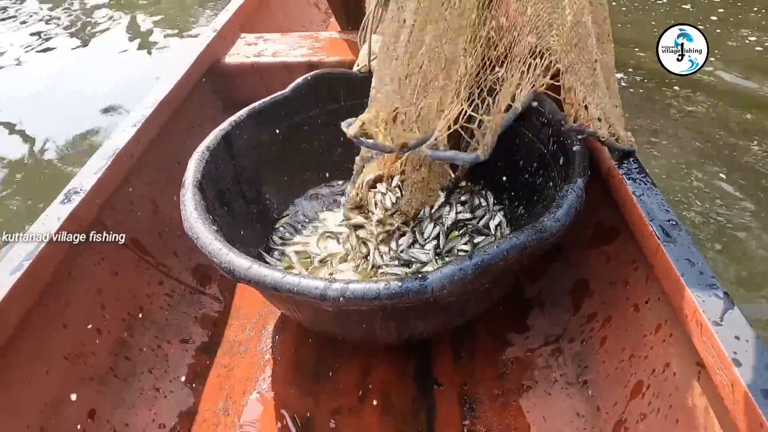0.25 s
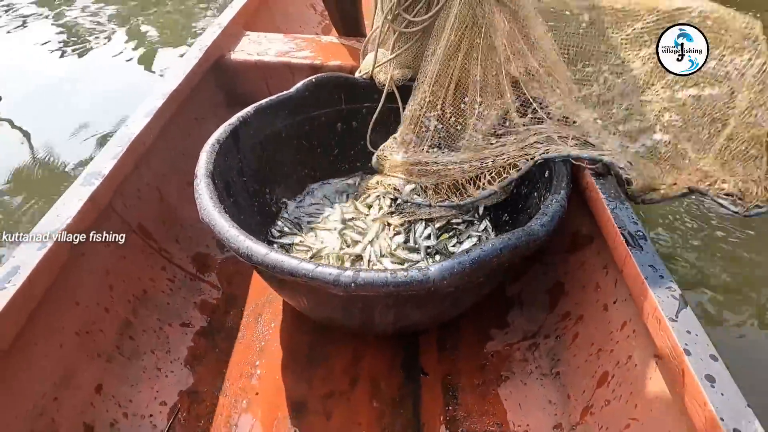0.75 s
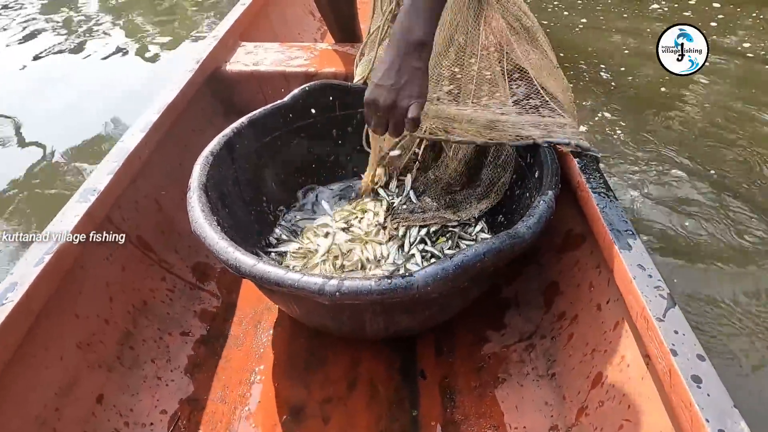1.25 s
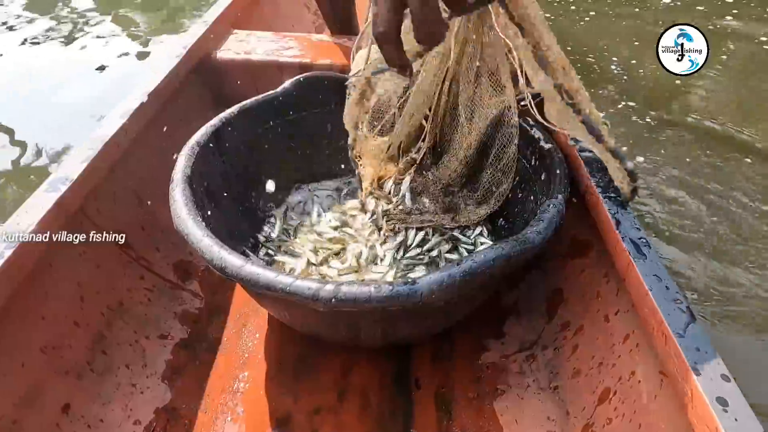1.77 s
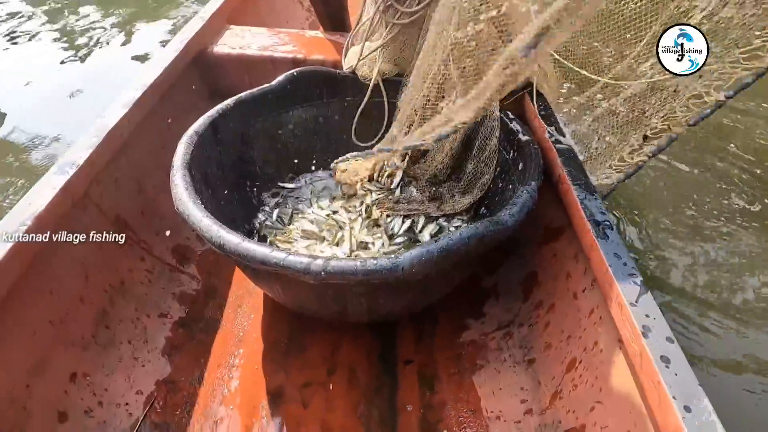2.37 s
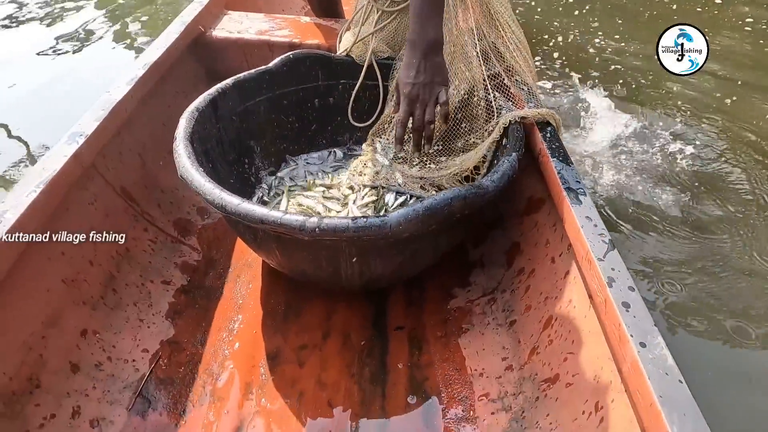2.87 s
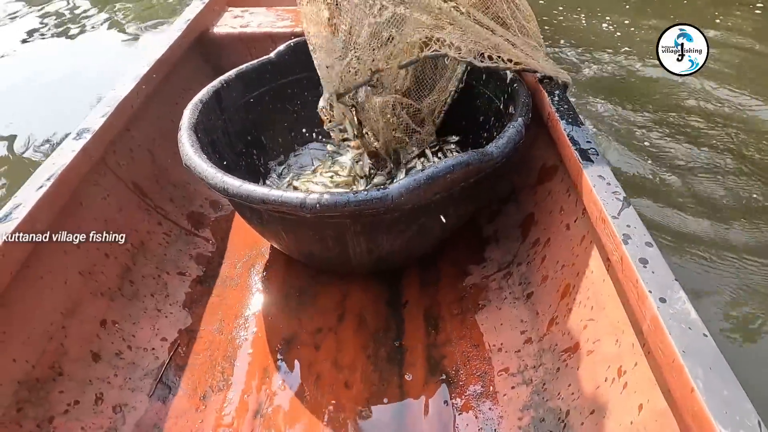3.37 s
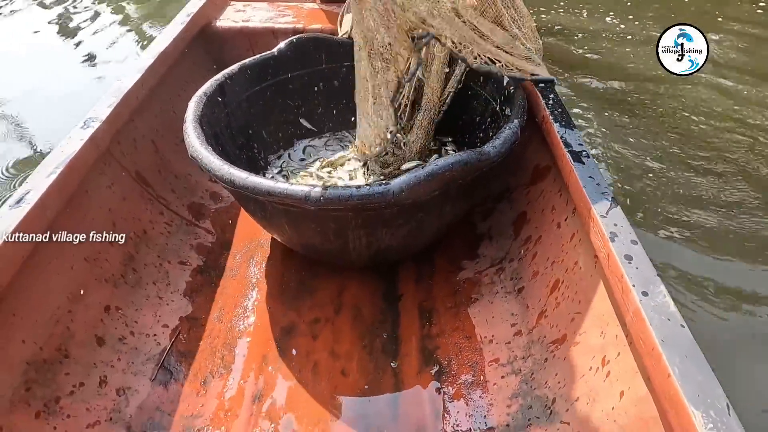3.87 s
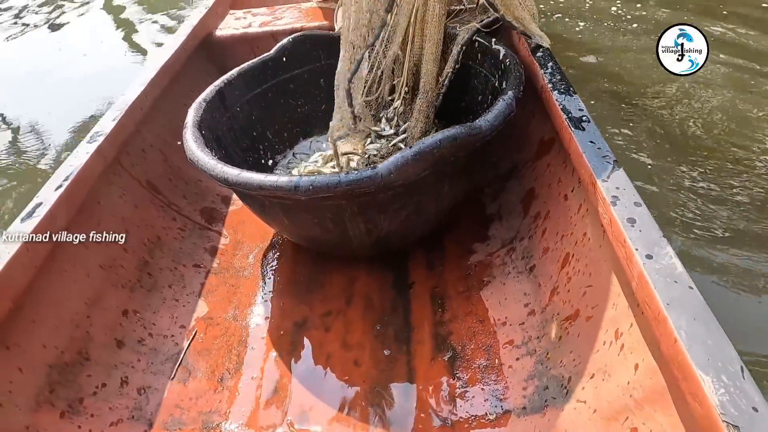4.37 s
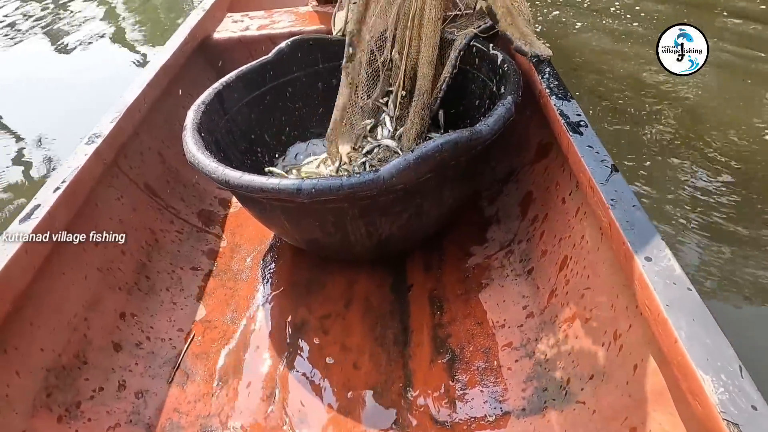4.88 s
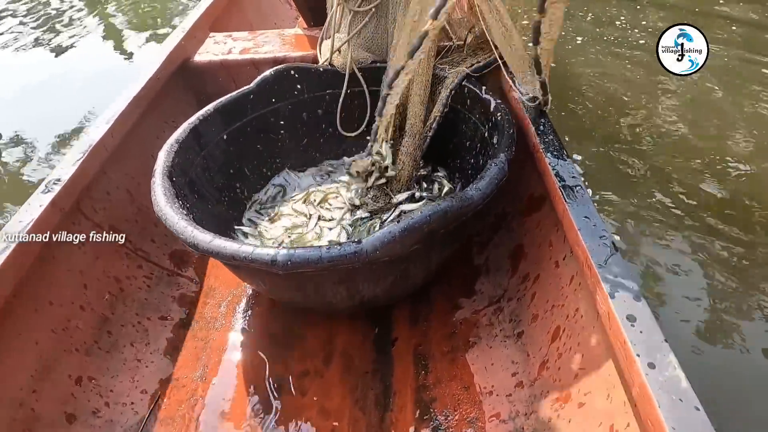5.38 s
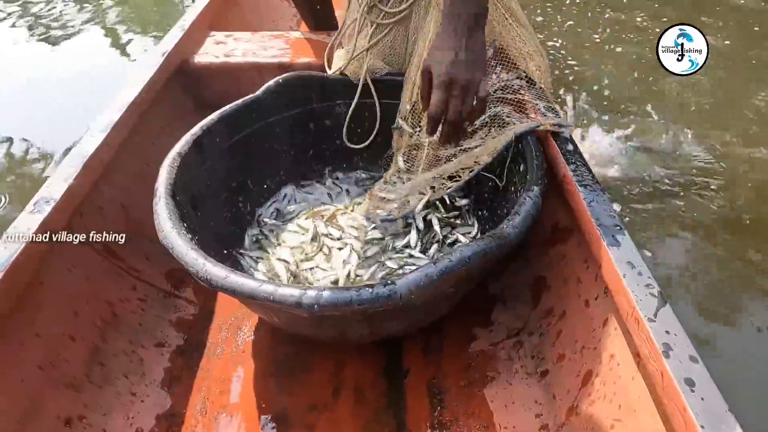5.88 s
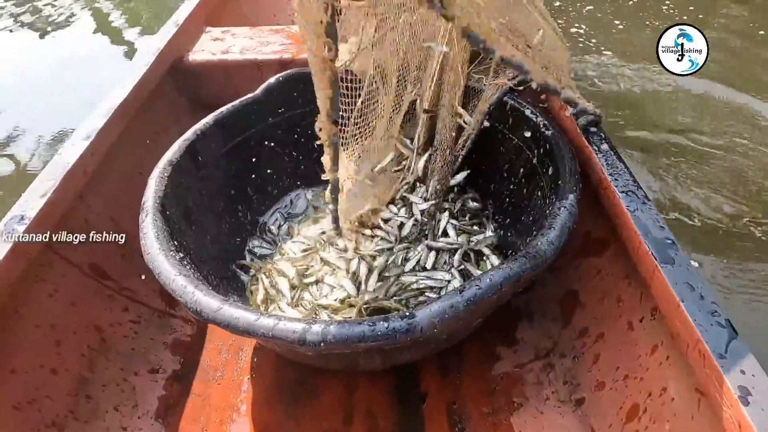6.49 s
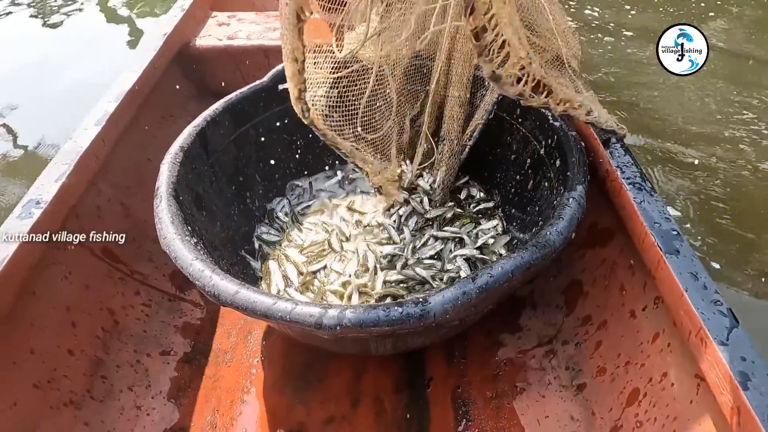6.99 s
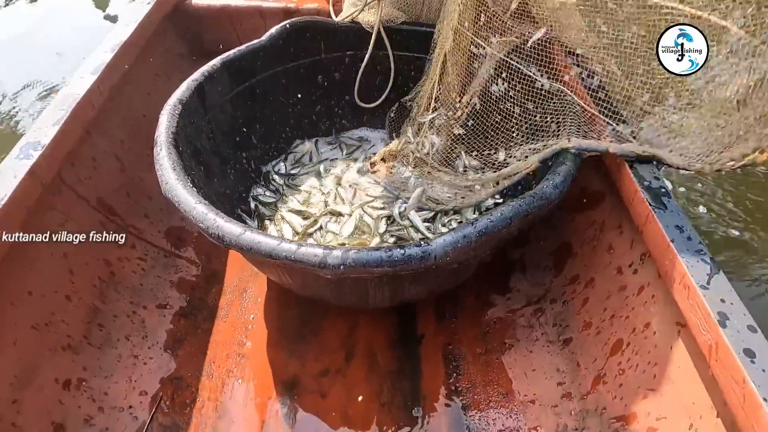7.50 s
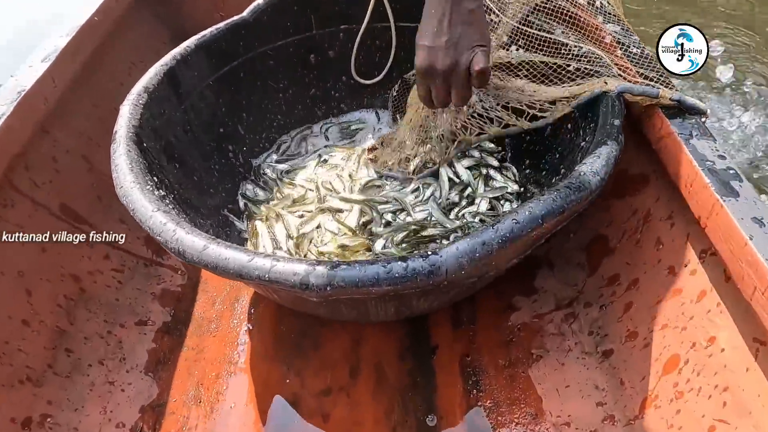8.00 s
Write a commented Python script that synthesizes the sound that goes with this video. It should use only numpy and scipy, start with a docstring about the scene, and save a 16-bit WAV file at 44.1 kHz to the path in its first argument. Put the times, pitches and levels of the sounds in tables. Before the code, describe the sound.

Outdoors in a wooden boat, closely heard and almost mono, a weighted wet net is shaken over small fish in a plastic tub. A hollow clatter opens at 0 s, with another knock at 0.25 and a stronger rattle and splash from 0.76 to 1.0. Two watery gulps follow at 1.1-1.2, then a low thump at 1.26. Lighter scraping and fish flicks lead to a hard clatter with spray at 2.6-2.8. Wet plips continue, with knocks near 3.4 and 3.9 and faint hoarse birds around 3-4. From 4 to 5.6 it is sparse: drips, small scrapes, a knock at 4.7, a distant bird at 5.2. A sharp rattle lands at 5.75, with splashing to 6. A splash and heavy low bump come near 6.5, a faint bird at 6.8, then a strong wet clatter at 7.55-7.9, easing into drips over light wind.

```python
"""Lead weights knock on tub and hull as a wet cast net is shaken out over small fish in a wooden boat.
The knocks are ragged noise bursts that ring struck modes; the dragging mesh is grainy noise through the
same modes. Spray is patchy noise with tiny rising tones, drips and fish flicks are short tones in noisy
puffs, and snaps are bright cracks. Behind them lie hollow gulps, a low thump, hoarse far birds in narrow
bands of noise, and a light wind and short low lumps of shaped noise."""
import sys
import numpy as np
from scipy import signal
from scipy.fft import rfft, irfft, next_fast_len
from scipy.io import wavfile
from scipy.ndimage import uniform_filter1d, map_coordinates

SR = 44100
rng = np.random.default_rng(int(sys.argv[2]) if len(sys.argv) > 2 else 0)


def unload_wav(signal):
    """Save mono or channel-first audio to the path in sys.argv[1] as 16-bit WAV at rate SR, clipped to [-1, 1]."""
    wavfile.write(
        sys.argv[1],
        SR,
        np.round(np.clip(np.atleast_2d(signal).T, -1, 1) * 32767).astype(np.int16),
    )


N = 363825

# Spectra are brought to rms 1 before mixing, so their levels are relative.
# low wind buffeting: (frequency [Hz], relative level [dB])
BUFFET_SPECTRUM = [(8.8, -33), (15, 7), (46, -0.5), (92, -15), (110, -7.5), (140, -56), (240, -120)]
# higher flutter, shared by wind and low lumps: (frequency [Hz], relative level [dB])
FLUTTER_SPECTRUM = [(35, -25.5), (60, 5.5), (91, -10.5), (129, 6), (216, -4.5), (320, -9.5), (420, -14.5),
                    (700, -120)]
# steady air of the river: (frequency [Hz], relative level [dB])
AIR_SPECTRUM = [(120, -25), (200, 12), (936, -14.5), (1040, -43), (1180, -35), (2940, -10), (7680, -1),
                (13000, -12), (15300, -54)]
# water spray: (frequency [Hz], relative level [dB])
SPRAY_SPECTRUM = [(530, -6.5), (900, -1.5), (1350, -4.5), (1630, -4.5), (1830, -4), (1990, -7.5),
                  (2410, -5.5), (3020, -6.5), (8170, -18), (15300, -27.5)]
# hiss that differs between left and right: (frequency [Hz], relative level [dB])
SIDE_HISS_SPECTRUM = [(2940, -26), (5000, -16), (8020, -16), (10000, -16), (12600, 0.5), (15300, -3)]
# treble roll-off of the microphone: (frequency [Hz], gain [dB])
MIC_TREBLE = [(5000, -1), (10000, -6.5), (13000, -9.5), (15500, -15)]
TOP_HZ = 15500  # band limit

# overall wind strength: (time [s], level [dB])
WIND_STRENGTH = [(0.0, -35.5), (0.46, -41.5), (0.94, -43), (1.31, -40.5), (1.56, -39), (1.79, -38),
                 (2.23, -41), (2.44, -41), (4.02, -45.5), (4.41, -47), (4.78, -41), (6.09, -44.5),
                 (6.52, -42.5), (7.35, -39), (7.7, -39), (8.25, -44.5)]
# short low lumps, from wind gusts and hull thuds: (time [s], level [dB])
LOW_LUMPS = [(0.05, -40), (0.94, -41.5), (1.07, -43.5), (1.56, -36.5), (1.77, -42), (2.0, -37.5),
             (2.3, -33), (2.64, -33.5), (2.76, -44), (3.49, -34.5), (3.68, -33.5), (4.2, -47), (4.8, -42),
             (4.93, -45.5), (5.77, -39.5), (6.45, -27), (6.52, -32.5), (6.65, -38), (6.91, -34.5),
             (7.07, -38), (7.16, -48), (7.9, -40)]
LUMP_RISE, LUMP_FALL = 314, 177  # dB per s
FLUTTER_DB = -16  # steady flutter, relative to the wind strength

# far bird notes: (time [s], length [s], pitch [Hz], bandwidth [Hz], level [dB])
BIRD_NOTES = [(3.03, .62, 1900, 600, -51), (3.17, .17, 1225, 30, -54), (3.06, .2, 1960, 45, -56),
              (3.21, .13, 1820, 45, -57), (3.89, .25, 1990, 55, -54.5), (3.95, .14, 2130, 50, -59),
              (5.22, .2, 3250, 350, -56), (6.8, .33, 1900, 200, -52)]
# hollow gulps of water: (time [s], level [dB], pitch [Hz], decay to -60 dB [s])
WATER_GULPS = [(1.073, -21.5, 272, 0.17), (1.19, -23.5, 415, 0.1), (2.975, -34.5, 557, 0.12),
               (6.935, -32, 687, 0.088)]
# a low thump, push and rebound: (time [s], level [dB], pitch [Hz], decay to -60 dB [s])
LOW_THUMP = [(1.258, -5.5, 54, 0.07), (1.272, -7, 8.8, 0.2)]

# single drops snapping on the plastic: (time [s], level [dB])
DROP_SNAPS = [(0.3431, -43), (0.987, -28), (1.0595, -40), (1.1424, -40), (1.268, -37.5), (1.613, -34.5),
              (1.9205, -37), (2.629, -45), (2.7576, -32), (2.7843, -23), (2.833, -31), (2.8634, -38),
              (4.1145, -40), (4.445, -38), (4.5496, -54), (4.9382, -39), (5.3966, -40), (6.4398, -37),
              (6.49, -40), (6.9541, -53), (7.5397, -36), (7.5562, -40), (7.866, -36.5), (8.116, -37)]
SNAP_T60_S = 0.0042
# drops and fish tails: (time [s], level [dB], starting pitch [Hz])
TAIL_FLICKS = [(0.3431, -34.5, 4700), (0.4414, -33, 2380), (0.569, -41, 2130), (0.7532, -31.5, 1600),
               (0.9058, -20, 2250), (1.0695, -21, 1550), (1.2441, -32, 3640), (1.27, -42, 2300),
               (1.481, -29, 2870), (1.5566, -29.5, 2940), (1.6122, -23, 2270), (1.8023, -24, 1860),
               (1.8901, -23.5, 2600), (2.1939, -26, 3020), (2.3521, -19, 2010), (2.4139, -19, 1650),
               (2.833, -18, 1600), (2.8913, -15, 2220), (2.935, -22, 3060), (3.0041, -36, 2580),
               (3.1747, -20, 1990), (3.4645, -43, 1525), (3.4885, -14.5, 2420), (3.5214, -28, 1840),
               (4.1145, -32, 4360), (4.1789, -35, 2860), (4.5231, -30.5, 2740), (4.5496, -35, 3900),
               (4.6179, -18, 2160), (4.9377, -32, 4650), (5.1921, -30, 2150), (5.2094, -30.5, 1810),
               (5.2405, -32, 2250), (5.4695, -31, 1890), (5.8152, -21, 2730), (6.1689, -23.5, 2440),
               (6.2861, -25, 3270), (6.4664, -18, 3040), (6.9546, -35, 1760), (7.0973, -24, 1860),
               (7.4994, -33, 1570), (7.5398, -33, 1670), (7.9379, -27, 2030), (8.115, -29, 1880),
               (8.1449, -25, 2080)]
FLICK_T60_S, PUFF_T60_S = 0.011, 0.022
SMALL_FLICK_DB, SMALL_FLICK_HZ = -49, 2400  # middle of the random flicks from the rest of the catch

# the net pulled across the rim:
# (time [s], hold [s], high-mode level [dB], deep-mode level [dB], spray level [dB])
NET_PULLS = [(0.0, 0.01, -42.5, -40, -44.5), (0.087, 0.056, -48, -61, -52), (0.248, 0.037, -38, -37.5, -60),
             (0.373, .01, -48.5, -48, -53.5), (0.503, .1, -83, -72, -67.5),
             (0.789, 0.022, -37.5, -32.5, -61), (0.875, 0.0091, -57, -32.5, -75),
             (0.909, 0.13, -33, -36.5, -54.5), (1.075, 0.075, -46.5, -51, -65),
             (1.21, 0.015, -64.5, -39, -74), (1.38, 0.061, -39.5, -43, -52), (1.48, .2, -49, -49, -48),
             (1.733, 0.021, -68, -46, -52.5), (1.817, 0.069, -52, -50.5, -51),
             (1.987, 0.11, -45, -46.5, -84), (2.205, 0.2, -45.5, -45, -51), (2.707, 0.025, -33, -32, -70),
             (2.782, 0.12, -36, -38.5, -38), (3.019, 0.0056, -41, -45, -48.5),
             (3.16, 0.011, -43.5, -56, -61), (3.332, 0.2, -45.5, -46.5, -52.5),
             (3.653, 0.0055, -39, -41.5, -50.5), (3.737, 0.0082, -67, -58, -58),
             (3.829, 0.15, -45, -46.5, -70), (4.05, 0.0084, -47, -47, -62), (4.133, .08, -51, -58, -59.5),
             (4.26, .05, -66, -64, -60.5), (4.32, 0.0082, -66, -64, -60), (4.377, 0.026, -76, -70, -57.5),
             (4.602, 0.0081, -62, -70, -58), (4.73, 0.14, -53.5, -52, -49.5),
             (4.969, 0.011, -45.5, -51.5, -56), (5.227, .01, -52.5, -58, -58),
             (5.289, 0.29, -66, -60, -55.5), (5.751, 0.22, -34, -38, -55),
             (5.913, 0.094, -33, -31.5, -40.5), (6.097, 0.0095, -43, -70, -55),
             (6.253, 0.0072, -40.5, -41.5, -49.5), (6.365, 0.19, -41.5, -46.5, -49.5),
             (6.669, 0.089, -40.5, -48, -54), (6.938, 0.011, -37.5, -46, -63),
             (7.062, 0.0084, -48, -55, -54), (7.112, 0.32, -49, -52.5, -51.5),
             (7.618, 0.21, -42.5, -39.5, -52), (7.727, .03, -37, -39, -49), (7.77, 0.093, -31, -52, -40),
             (8.076, .01, -60, -44.5, -54.5), (8.215, 0.025, -51, -58, -51)]
PULL_RISE, PULL_FALL = 620, 324  # dB per s before and after the hold
SPRAY_RISE, SPRAY_FALL = 370, 154  # the water gathers and drains more slowly, dB per s
# water flung off the mesh in short splashes: (time [s], level [dB])
MESH_SPLASHES = [(0.255, -45.5), (0.341, -52), (0.664, -52), (0.763, -34), (0.99, -32.5), (1.012, -39),
                 (1.075, -37), (1.192, -44.5), (1.267, -40), (1.35, -47.5), (1.47, -40), (1.969, -39),
                 (2.34, -45.5), (2.635, -28), (2.71, -46.5), (2.762, -26), (2.785, -35), (3.01, -46),
                 (3.172, -40), (3.375, -42.5), (3.465, -31), (3.881, -43), (4.11, -61), (4.62, -50),
                 (4.731, -37.5), (4.961, -38.5), (5.401, -50), (5.758, -34), (5.902, -31), (6.17, -48),
                 (6.295, -64), (6.4, -52), (6.495, -26), (6.73, -58), (7.038, -37), (7.26, -45),
                 (7.557, -28), (7.657, -36), (7.8, -33), (7.876, -31)]
SPLASH_RISE, SPLASH_FALL = 1150, 1450  # dB per s
# level of the ever-present, rising and falling background of dripping: (time [s], level [dB])
DRIP_LEVEL = [(0, -67), (.57, -57), (.72, -65), (1.3, -61), (1.6, -70), (2.02, -62), (2.4, -49.5),
              (2.9, -60.5), (3.25, -64), (3.8, -63), (4.45, -67), (4.82, -60), (5.08, -72), (5.17, -68.5),
              (5.35, -54.5), (6.0, -64), (6.76, -47.5), (7.5, -67.5), (7.9, -59), (8.25, -59)]

# tub and hull modes; each use shortens the decay by its own factor:
# (pitch [Hz], level [dB], relative decay [s])
HULL_MODES = [(217, -19, 0.14), (307.3, -9.5, 0.15), (421.7, -1, 0.1), (553, -1.5, 0.1), (655, -2.5, 0.077),
              (830, -5, 0.058), (1061, -2, 0.059), (1141, -2, 0.031), (1237, -6, 0.032), (1398, -12, 0.042),
              (1620, -15.5, 0.042), (2070, -21, 0.017), (2496, -29, 0.073), (2876, -27, 0.023),
              (3430, -26.5, 0.017)]
# weights landing; the tilts are relative, before fixed offsets:
# (time [s], level [dB], deep-mode tilt [dB], bright-mode tilt [dB])
WEIGHT_KNOCKS = [(0.0, -8.5, -16.5, -19), (0.091, -32, 7, 0), (0.133, -31, 5, -9), (0.196, -32, -4, 1),
                 (0.257, -12, -9, -19), (0.272, -17, -7.5, -33), (0.373, -33.5, -10, -5),
                 (0.762, -9.5, -5, -8), (0.81, -29.5, -11, -29.5), (0.867, -29, -5, -33),
                 (0.907, -25, -27, -1), (0.989, -21, -10, -32), (1.009, -11.5, -22.5, -22.5),
                 (1.068, -27.5, 0, -6), (1.191, -33, -29, -37), (1.389, -27.5, -40, -56),
                 (1.467, -16, -20.5, -43), (1.537, -29.5, -23, -18.5), (1.61, -29, -13, -10),
                 (1.735, -24, -11, -38), (1.761, -33, -6, 4), (1.962, -22, -8, -3.5),
                 (2.104, -28, -31, -11), (2.198, -28, -13, -6.5), (2.282, -25.5, -40, -17),
                 (2.334, -22.5, -10, -2), (2.458, -25, 1, 5), (2.623, -21, -3, 1), (2.636, -3.5, -7, -13.5),
                 (2.7, -17.5, -11.5, -8), (2.73, -43, -5, -13.5), (2.758, -9.5, -4, -4),
                 (2.835, -28, -16, -10), (2.864, -16, -14, -48), (2.883, -21, -9.5, -8.5),
                 (3.341, -25, -27, -27), (3.363, -14, -17.5, -22.5), (3.392, -24, -16, -22),
                 (3.437, -23, -5, -17), (3.46, -6.5, -21, -16), (3.654, -26.5, 0.5, 1),
                 (3.748, -35, 12, -27), (3.825, -15.5, -7.5, -17.5), (3.846, -27, 2, -28),
                 (3.879, -13, -12.5, -25), (4.147, -33.5, -5, 3), (4.206, -36.5, -9.5, -22),
                 (4.319, -33.5, -8.5, 1), (4.656, -35.5, -5, 9), (4.726, -13, -13.5, -31),
                 (4.958, -40.5, -10, -8), (5.29, -26, -29, -14), (5.312, -35, 3, -35),
                 (5.396, -21, -21, -20.5), (5.444, -24, -13, -14), (5.753, -5, -19, -14),
                 (5.771, -15, -4, -8), (6.169, -36.5, -15, -12), (6.339, -27, -1, -26),
                 (6.358, -23, -10, -22), (6.403, -22, -14, -5), (6.438, -23, -13, -2),
                 (6.457, -24, -2, -13), (6.494, -15, -7, 9), (6.55, -29.5, -7, -3), (6.65, -31.5, -11, -35),
                 (6.682, -22.5, -9, -21), (6.717, -28.5, -3, 15), (6.922, -28.5, -30, -14),
                 (7.037, -21.5, -5, 9.5), (7.361, -33.5, 13, 10), (7.557, -7, -11.5, -10),
                 (7.571, -15.5, -10, -40), (7.629, -20.5, -23, -16), (7.657, -22.5, -11, -5),
                 (7.797, -21, -9, -7.5), (7.817, -14, 3.5, 10.5), (7.862, -15.5, -10, 5.5),
                 (7.999, -37.5, -24, -12), (8.031, -35.5, 0, -23), (8.071, -24, -24.5, -33),
                 (8.116, -35, -14, -21), (8.225, -34, -20, -36)]


def amp(db):
    """Gain from decibels."""
    return 10 ** (np.asarray(db) / 20)


def unit(x):
    """x at rms 1."""
    return x / np.sqrt(np.mean(x ** 2) + 1e-20)


def curves(rows):
    """One value per sample for each column after the time."""
    s, *cols = np.transpose(rows)
    return [np.interp(np.arange(N) / SR, s, c) for c in cols]


def wobble(rate):
    """A smooth random curve, rate knots a second."""
    knots = rng.standard_normal(int(N * rate / SR) + 4)
    return map_coordinates(knots, [np.arange(N) * rate / SR])


def filtered(x, response):
    """x times a response of frequency."""
    m = next_fast_len(N + SR // 2)
    return irfft(rfft(x, m) * response(np.fft.rfftfreq(m, 1 / SR)), m)[..., :N]


def coloured(x, spectrum):
    """x shaped by (Hz, dB) points on a log axis, at rms 1."""
    f, db = np.transpose(spectrum)
    return unit(filtered(x, lambda hz: amp(np.interp(np.log(hz + 1), np.log(f), db))))


def grainy(spiky_db, rate):
    """Noise whose size wanders at random, rate knots a second, at rms 1."""
    return unit(amp(spiky_db * wobble(rate)) * rng.standard_normal(N))


def patchy(depth_db, bins, frames):
    """Noise with patches of random gain in pitch and time."""
    z = signal.stft(rng.standard_normal(N + 256), nperseg=128)[2]
    field = uniform_filter1d(rng.standard_normal(z.shape), int(bins), 0)
    field = uniform_filter1d(field, int(frames), 1)
    return signal.istft(z * amp(depth_db * unit(field)), nperseg=128)[1][:N]


def ringing(t, db, hz, t60, attack):
    """A dying tone with a soft start."""
    return amp(db - 60 * t / t60) * np.sin(2 * np.pi * hz * t) * (1 - np.exp(-t / attack))


def swells(start, hold, db, rise, fall):
    """Gain of events that each rise, hold and fall at steady dB per s; their powers add."""
    t = np.arange(0, N + 64, 64)[:, None] / SR  # worked out every 64 samples
    away_db = np.maximum(rise * (start - t), fall * (t - start - hold)).clip(0)
    gain = np.sqrt(np.sum(amp(db - away_db) ** 2, 1))
    return np.interp(np.arange(N) / SR, t[:, 0], gain)


def add(track, s, sound):
    """Mix a sound in at a time."""
    part = track[max(round(s * SR), 0):][:len(sound)]
    part += sound[:len(part)]


def wind():
    """Low buffeting, a higher flutter with short low lumps, and the steady air of the river, all noise."""
    strength_db, = curves(WIND_STRENGTH)
    lump_s, lump_db = np.transpose(LOW_LUMPS)
    buffet = coloured(rng.standard_normal(N) * amp(0.68 * wobble(2.0)), BUFFET_SPECTRUM)
    flutter = coloured(rng.standard_normal(N) * amp(1.5 * wobble(12)), FLUTTER_SPECTRUM)
    air = coloured(rng.standard_normal(N), AIR_SPECTRUM)
    lumps = swells(lump_s, 0, lump_db, LUMP_RISE, LUMP_FALL)
    steady = amp(strength_db + FLUTTER_DB)
    return amp(strength_db) * buffet + (lumps + steady) * flutter + amp(-64.5) * air


def birds():
    """Hoarse far notes: slow noise moved up to each pitch makes a narrow band."""
    out = np.zeros(N)
    for s, length, hz, width_hz, db in BIRD_NOTES:
        t = np.arange(round(length * SR)) / SR
        pole = np.exp(-np.pi * width_hz / SR)
        blur = signal.lfilter([1], [1, -pole], rng.standard_normal((2, SR)))[:, -len(t):]
        note = blur[0] * np.sin(2 * np.pi * hz * t) + blur[1] * np.cos(2 * np.pi * hz * t)
        add(out, s, amp(db) * unit(note) * signal.windows.tukey(len(t), .5))
    return out


def hollows():
    """Air pockets gulp in the water as dying tones; a low thump pushes and swings back."""
    out, t = np.zeros(N), np.arange(SR // 3) / SR
    for s, *tone in WATER_GULPS:
        add(out, s, ringing(t, *tone, 0.00067))
    for sense, (s, *tone) in zip([1, -1], LOW_THUMP):
        add(out, s, sense * ringing(t, *tone, 0.00068))
    return out


def snaps():
    """Each snap is a bright crack of noise that dies at once."""
    out, t = np.zeros(N), np.arange(SR // 50) / SR
    for s, db in DROP_SNAPS:
        crack = signal.lfilter([1, -2, 1], np.poly([.45, .45]), rng.standard_normal(len(t)))
        add(out, s, amp(db - 60 * t / SNAP_T60_S) * unit(crack))
    return out


def flicks():
    """Each drop or tail flick is a short rising tone inside a wet puff around the same pitch."""
    out, t = np.zeros(N), np.arange(SR // 25) / SR
    when, size, pitch = rng.random((90, 3)).T
    small_db = SMALL_FLICK_DB + 12 * (size - .5)
    small_hz = SMALL_FLICK_HZ * 3.2 ** (pitch - .5)
    for s, db, hz in [*TAIL_FLICKS, *zip(when * N / SR, small_db, small_hz)]:
        tone = ringing(t, 1.5, hz * (1 + 8 * t), FLICK_T60_S, 0.0018)
        pole = np.exp(-np.pi * .8 * hz / SR)
        blur = signal.lfilter([1], np.poly([pole] * 2), rng.standard_normal(len(t)))
        puff = unit(blur) * ringing(t, -6.2, hz, PUFF_T60_S, 0.00078)
        add(out, s, amp(db) * (tone + puff))
    return out


def droplets(count, mid_hz, cycles, spiky_db):
    """A steady rain of tiny bubbles, each a short rising tone, at rms 1."""
    when, size = rng.random((2, count, 1))
    hz = mid_hz * np.exp(0.556 * rng.standard_normal((count, 1))).clip(.3, 4)
    t = np.arange(128) / SR
    tones = amp(spiky_db * size ** 2) * np.sin(2 * np.pi * hz * t * (1 + 12 * t))
    tones *= np.exp(-t * hz / cycles) * (1 - np.exp(-t / 0.00025))
    tones *= np.cos(np.pi / 2 * t / t[-1])  # fade to silence
    places = (when * N).astype(int) + np.arange(128)
    return unit(np.bincount(places.ravel(), tones.ravel(), N + 256)[:N])


def hull(x, modes):
    """x through the resonances of some hull modes, neighbours in opposite senses, at rms 1."""
    def response(f):
        total = 0
        for k, (centre, db, t60) in enumerate(modes):
            damping = 1j * f * 6 / t60
            total = total + (-1) ** k * amp(db) * damping / (centre * centre - f * f + damping)
        return total
    return unit(filtered(x, response))


def net():
    """Knots and weights scrape the hull into ringing; water leaves the mesh as spray and droplets."""
    s, hold, high_db, deep_db, spray_db = np.transpose(NET_PULLS)
    splash_s, splash_db = np.transpose(MESH_SPLASHES)
    wet = swells(s, hold, spray_db, SPRAY_RISE, SPRAY_FALL)
    wet += swells(splash_s, 0, splash_db, SPLASH_RISE, SPLASH_FALL)
    wet += amp(curves(DRIP_LEVEL)[0] + 2.5 * wobble(25))

    drops = amp(2 * wobble(700) + 1.5 * wobble(200)) * amp(1.2 * wobble(40))
    spray = coloured(drops * patchy(depth_db=4.0, bins=4.5, frames=4), SPRAY_SPECTRUM)
    spray += amp(-8) * droplets(count=9000, mid_hz=2600, cycles=10, spiky_db=24)
    # a faint side hiss follows the spray level; opposite signs put the hiss at the sides
    side_hiss = amp(-19) * coloured(drops * rng.standard_normal(N), SIDE_HISS_SPECTRUM)

    scrape = grainy(spiky_db=2.5, rate=140)
    deep = [mode for mode in HULL_MODES if mode[0] < 610]
    high = [mode for mode in HULL_MODES if mode[0] > 610]
    ring = swells(s, hold, high_db, PULL_RISE, PULL_FALL) * hull(scrape, high)
    ring += swells(s, hold, deep_db, PULL_RISE, PULL_FALL) * hull(scrape, deep)
    uneven_db = 1.5 * wobble(30)
    return amp(uneven_db) * ring + wet * (spray + [side_hiss, -side_hiss])


def knocks():
    """A string of weights lands within a few ms; the ragged push rings the hull modes at new strengths."""
    out, t = np.zeros(N), np.arange(SR // 10) / SR
    hz, level, t60 = np.transpose(HULL_MODES)[:, :, None]
    facing = (-1.0) ** np.arange(len(HULL_MODES))[:, None]  # neighbouring modes push in opposite senses
    chance = rng.standard_normal((len(WEIGHT_KNOCKS), len(HULL_MODES), 2))
    landing = np.exp(-t / 0.0095) * (1 - np.exp(-t / 0.00046))
    for (s, db, deep_db, bright_db), luck in zip(WEIGHT_KNOCKS, chance):
        tilt_db = [deep_db + 5, 0, bright_db + 21.5]
        place_db = np.interp(np.log(hz), np.log([400, 850, 2000]), tilt_db)
        mode_db = level + place_db + 2.64 * luck[:, 1:]
        mode_hz = hz * (1 + 0.034 * luck[:, :1])
        ring = np.sum(facing * ringing(t, mode_db, mode_hz, 0.47 * t60, 0.000067), 0)
        push = landing * rng.standard_normal(len(t)) ** 3
        push[30] += 2.1 * amp(0.57 * db) * np.linalg.norm(push)  # in a hard blow one weight leads
        blow = signal.fftconvolve(push[:1500], ring)[:len(t)]
        wet_mesh = signal.lfilter([1, -1], np.poly([.8, .7, .4]), rng.standard_normal(len(t)))
        slap = amp(bright_db - 35.0) * landing * wet_mesh
        add(out, s, amp(db + 2.47) * (blow / np.abs(blow).max() + slap))
    return out


def scene():
    """All the layers mixed; nearly everything reaches both channels alike."""
    return wind() + birds() + hollows() + snaps() + flicks() + net() + knocks()


def record(dry):
    """The microphone loses treble; a faint hiss differs between channels; a band limit cuts the top."""
    hiss = amp(-78) * coloured(rng.standard_normal(N), SIDE_HISS_SPECTRUM)
    f, db = np.transpose(MIC_TREBLE)
    dull = filtered(dry, lambda hz: amp(np.interp(hz, f, db)))
    return filtered(dull + [hiss, -hiss], lambda hz: hz < TOP_HZ)


dry = scene()
out = record(dry)
unload_wav(out)
```